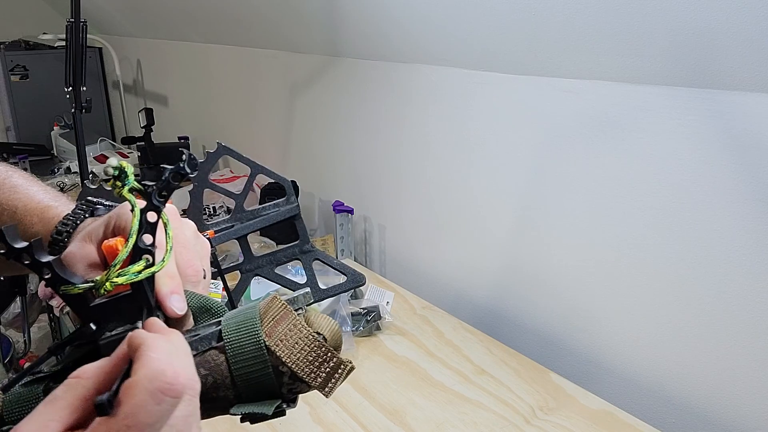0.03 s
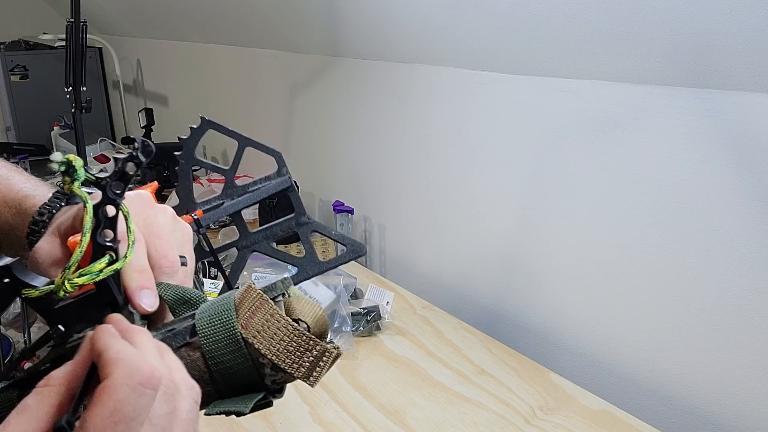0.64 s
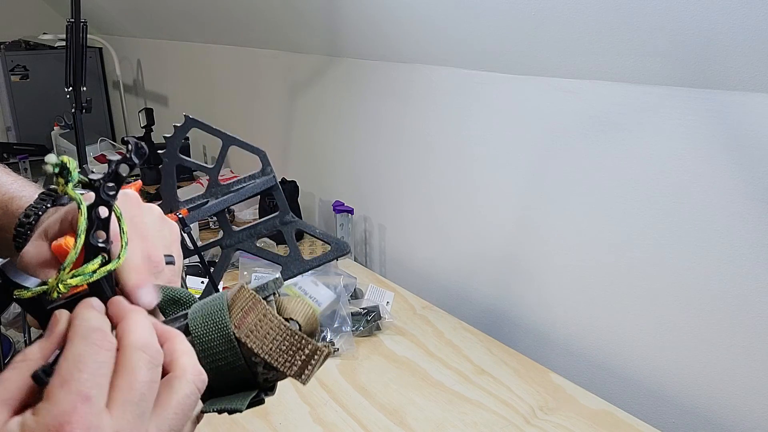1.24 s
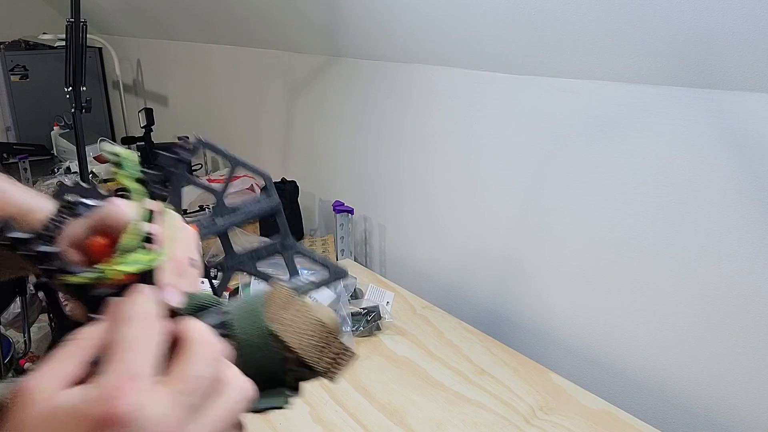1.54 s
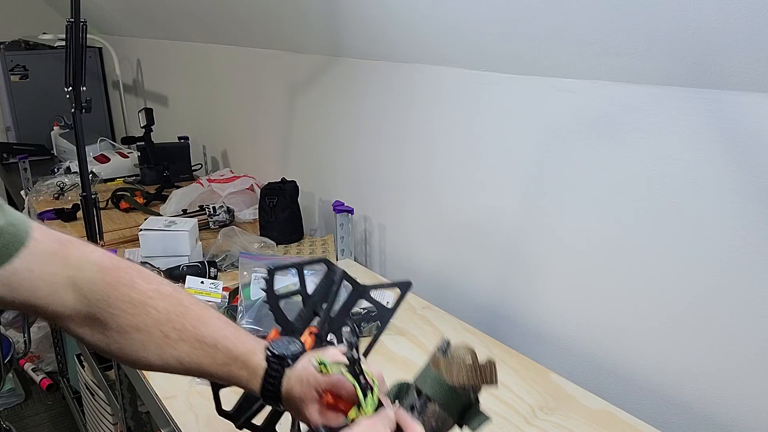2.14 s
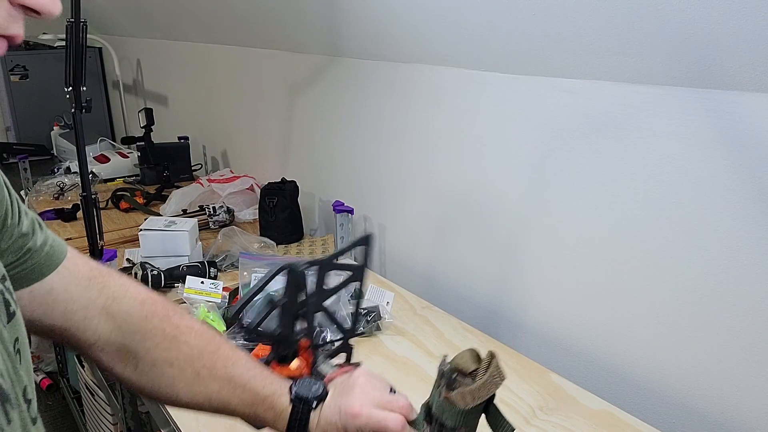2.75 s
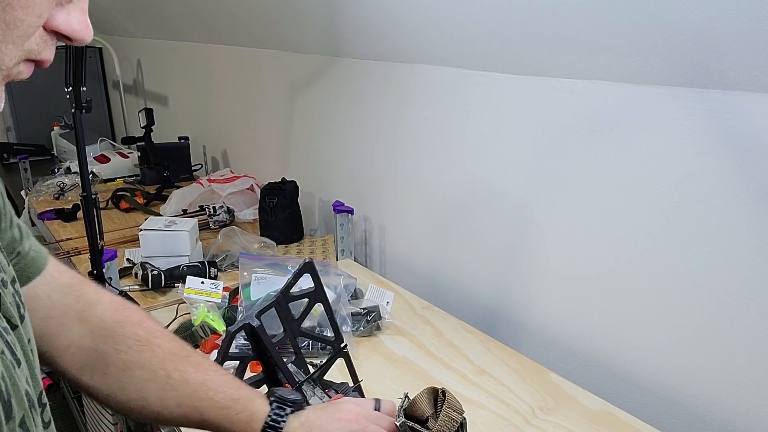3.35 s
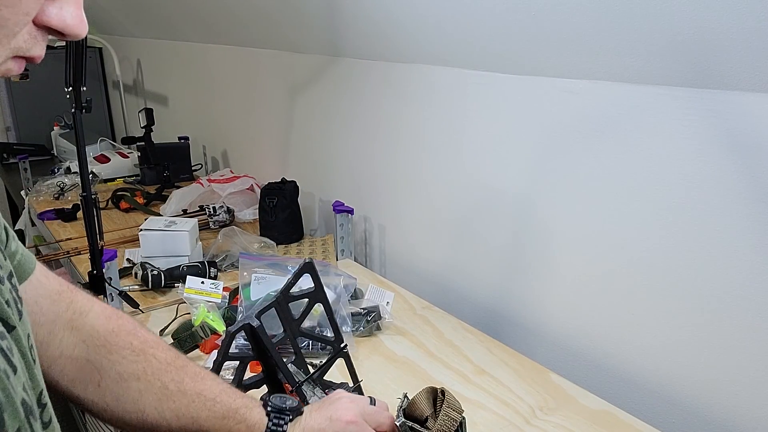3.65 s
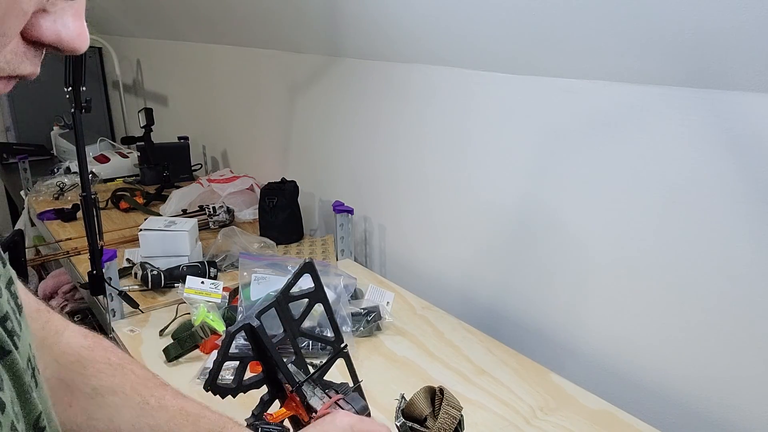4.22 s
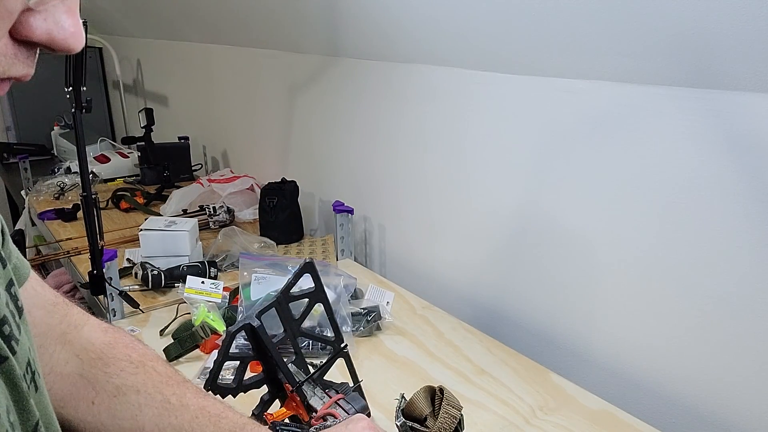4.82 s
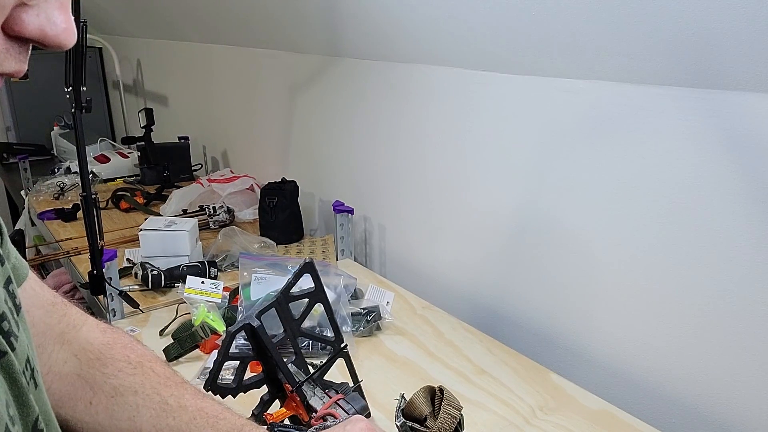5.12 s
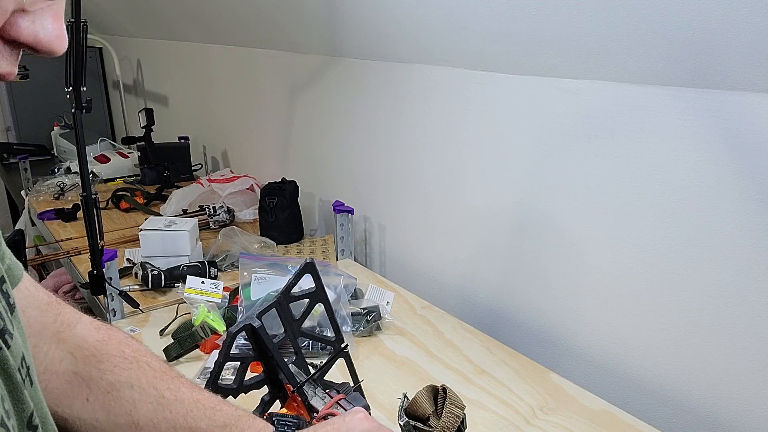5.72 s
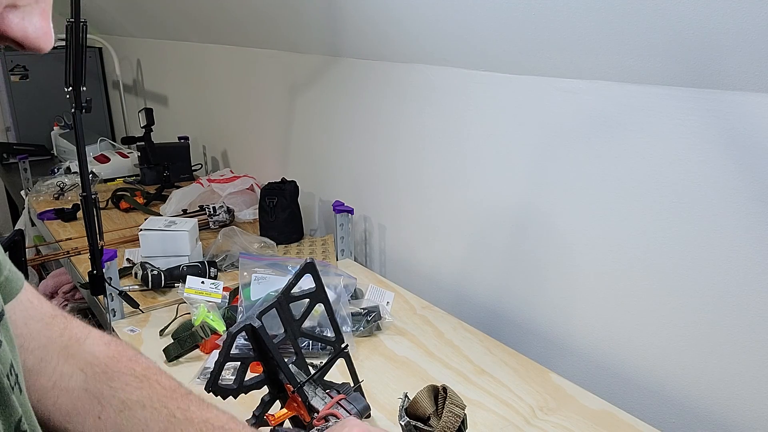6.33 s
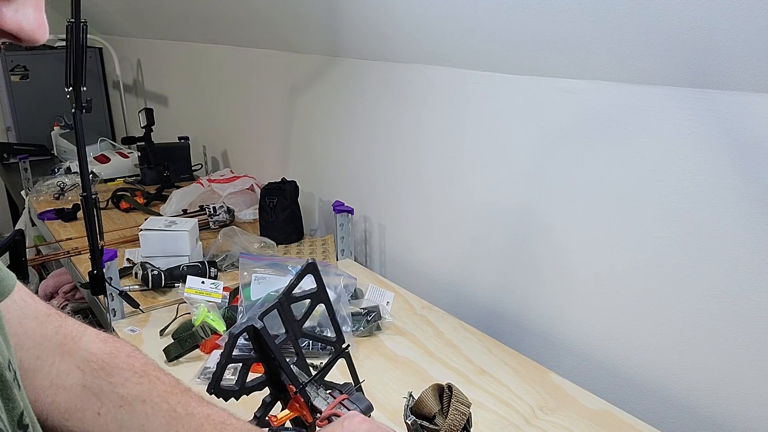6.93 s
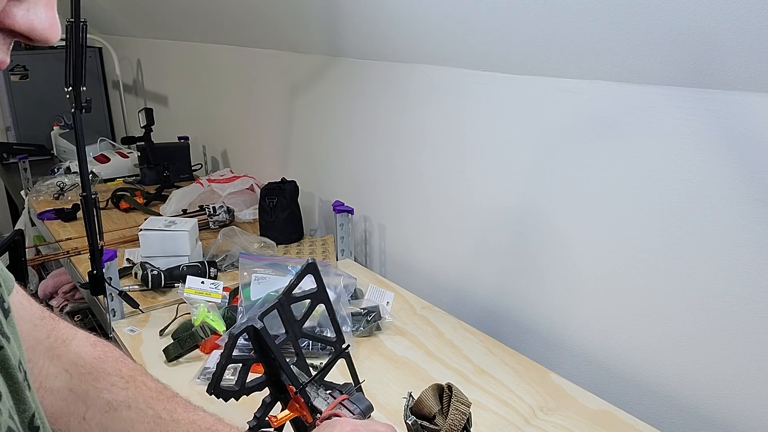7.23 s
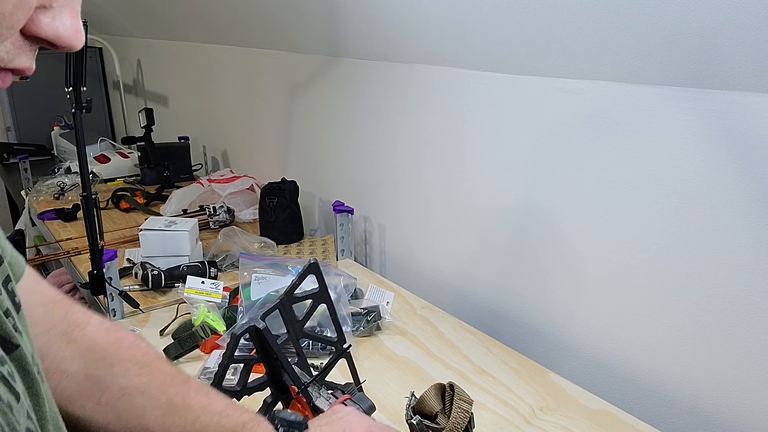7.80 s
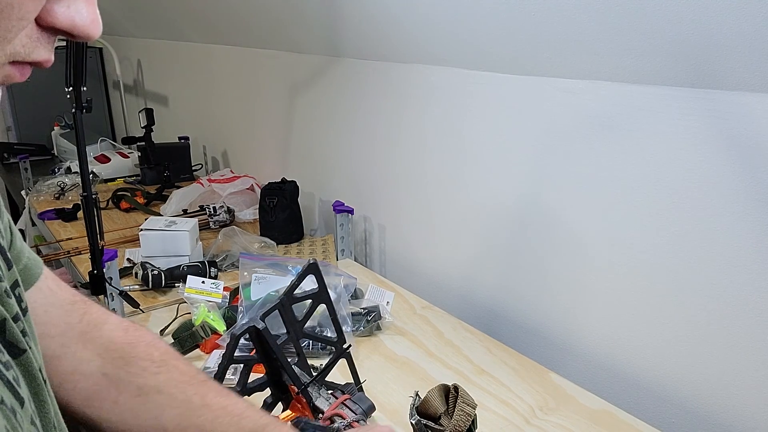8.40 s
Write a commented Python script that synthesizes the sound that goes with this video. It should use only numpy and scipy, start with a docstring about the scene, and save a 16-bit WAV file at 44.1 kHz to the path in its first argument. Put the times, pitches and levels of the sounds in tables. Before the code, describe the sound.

A faint fan hums throughout in a small workshop. At about 2 seconds a climbing stick with metal steps touches a plywood bench, then lands at 2.2 with hollow knocks, a low scuff and a faint metal ring, setting loose tools chattering. The loudest clunks come just after 3 seconds, with a bright rattle and another bounce at 3.3. Soft rubbing fades away by about 4.5. At 5.4 a plastic buckle clicks sharply, followed by tiny high ticks of webbing fibres being picked until 6.2. The strap swishes through the clicking buckle around 6.3 to 6.5, with faint tugs and clicks near 6.9 and 7.3. At about 7.9 the stick shifts with a short, low groan, then knocks down at 8.1, rattling the tools and rocking quickly to rest.

```python
"""A small workshop, a fan humming. A climbing stick with metal steps is lowered onto a plywood bench:
it slides, lands, rocks and bounces. Each blow flexes the top and rings its modes; the hard ones set
loose tools chattering. A webbing strap is picked at, fibres snapping, and swishes through its clicking
plastic buckle. Then the stick is shifted, groaning as it catches and slips, and knocked down once more."""
import sys
import numpy as np
from scipy import signal
from scipy.fft import rfft, irfft, next_fast_len
from scipy.io import wavfile
from scipy.ndimage import uniform_filter1d

SR = 44100
rng = np.random.default_rng(int(sys.argv[2]) if len(sys.argv) > 2 else 0)


def wav_record(signal):
    """Record a signal, one row per channel, as 16-bit PCM in the file named by sys.argv[1]."""
    frames = np.transpose(np.atleast_2d(signal))
    bounded = np.clip(frames, -1, 1)
    # unit amplitude maps onto the largest positive 16-bit level
    quanta = np.round(bounded * 32767).astype(np.int16)
    wavfile.write(sys.argv[1], SR, quanta)


N = 377496


def from_db(db):
    """Decibels to amplitude."""
    return 10 ** (np.asarray(db) / 20)


def at_hz(points, hz):
    """Read a curve on a log-frequency axis."""
    f, value = np.transpose(points)
    return np.interp(np.log(np.maximum(hz, 1)), np.log(f), value)


def fade(t, t60):
    """Exponential decay, 60 dB down after t60 seconds."""
    return np.exp(-np.log(1000) * t / t60)


def swell(t, rise_s):
    """Rounded attack of a contact that is not perfectly hard."""
    return (1 - np.exp(-t / rise_s)) ** 2


def mode(t, hz, db, t60):
    """One struck resonance: a decaying sine."""
    return from_db(db) * np.sin(2 * np.pi * hz * t) * fade(t, t60)


def add(out, s, sound):
    """Mix a sound in at s seconds."""
    i = round(s * SR)
    out[:, i:i + sound.shape[-1]] += sound[..., :N - i]


def pan(right_db):
    """Stereo gains with the right side louder by right_db."""
    return from_db(np.array([[-right_db], [right_db]]) / 2)


def noise(colour, size, width=None, weight=None):
    """Coloured stereo noise, mid rms about 1 before the optional weighting curve."""
    # default stereo image, narrow lows and wide highs: (frequency [Hz], side minus mid [dB])
    room_width = [(60, -24), (110, -29), (200, -10.5), (380, -11), (700, -5.5), (1290, 1), (2400, 0),
                  (15000, 1.5)]
    n = next_fast_len(size, True)
    hz = np.fft.rfftfreq(n, 1 / SR)
    gain = from_db(at_hz(colour, hz))
    gain /= np.sqrt(np.mean(gain ** 2))
    if weight is not None:
        gain *= from_db(at_hz(weight, hz))
    mid, side = rfft(rng.standard_normal((2, n))) * gain
    side *= from_db(at_hz(room_width if width is None else width, hz))
    return irfft([mid + side, mid - side], n)[:, :size]


def grains(per_s, spread_db, size):
    """Random tiny contacts of uneven strength, rms 1."""
    clicks = (rng.random(size) < per_s / SR) * rng.choice([-1, 1], size)
    clicks = clicks * from_db(spread_db * np.clip(rng.normal(size=size), -2, 2))
    return clicks / np.sqrt(np.mean(clicks ** 2) + 1e-12)


def strokes(rows, attack_s, release_t60):
    """Envelope of hand movements: each takes hold, keeps its pressure and lets go."""
    out, t = np.zeros((1, N)), np.arange(2 * SR) / SR
    for s, length, db in rows:
        add(out, s, from_db(db) * swell(t, attack_s) * fade(np.maximum(t - length, 0), release_t60))
    return out


def rub(colour, pressure, per_s, grit):
    """Friction noise that swells at each tiny catch of the surfaces; grit runs from 0 to 1."""
    catches = uniform_filter1d(grains(per_s, spread_db=2.5, size=N) ** 2, SR // 1000)
    return noise(colour, N) * pressure * np.sqrt(np.abs(1 - grit + grit * catches))


def workshop(x, wet_db, room_t60=0.61, treble_t60=0.44, treble_hz=6000):
    """Direct sound plus dense stereo reflections whose treble is absorbed sooner."""
    t = np.arange(SR // 2) / SR
    white = rng.standard_normal((2, len(t))) * (t > .002)
    dull = signal.sosfiltfilt(signal.butter(2, treble_hz, fs=SR, output="sos"), white)
    echoes = dull * fade(t, room_t60) + (white - dull) * fade(t, treble_t60)
    echoes /= np.sqrt(np.sum(echoes ** 2, axis=1, keepdims=True))
    return x + from_db(wet_db) * signal.fftconvolve(x, echoes, axes=1)[:, :N]


def fan(hum_hz, hum_db, air_db, hiss_db):
    """A steady bed of moving air, faint hiss and a narrow low drone."""
    # spectra of the air and the hiss: (frequency [Hz], level [dB])
    air_colour = [(15, -52), (25, -16), (43, -15), (76, -1), (141, -7.5), (173, -6.5), (208, -15),
                  (230, -3), (326, -6), (435, -2.5), (473, -10.5), (1220, -10.5), (1590, -14.5),
                  (2030, -13), (3400, -17), (4420, -68), (7480, -120)]
    hiss_colour = [(2800, -4.5), (3300, 6.5), (3800, 1.5), (4600, 3), (5200, -4.5), (7000, -4.5),
                   (8200, -23.5), (10000, -25.5), (16000, -21)]
    # their stereo image: (frequency [Hz], side minus mid [dB])
    air_width = [(60, -14), (200, -14), (380, -9.5), (700, -3), (1290, -0.5), (15000, 1.5)]
    air = from_db(air_db) * noise(air_colour, N, air_width) * pan(right_db=1.5)
    hiss = from_db(hiss_db) * noise(hiss_colour, N, air_width) * pan(right_db=5.5)
    peak = [(hum_hz / 2, -70), (hum_hz * .9, -20), (hum_hz, 0), (hum_hz * 1.1, -20), (hum_hz * 2, -70)]
    return air + hiss + from_db(hum_db) * noise(peak, N)


def frame_ring(hz, t60, laid_down_s):
    """The lifted frame sings in its lowest bending mode, choked once it is laid down."""
    # touches on the frame: (time [s], level [dB])
    touches = [(2.031, -63), (2.245, -49)]
    out, t = np.zeros((2, N)), np.arange(2 * SR) / SR
    for s, db in touches:
        choke = fade(np.maximum(s + t - laid_down_s, 0), t60=.1)
        add(out, s, mode(t, hz, db, t60) * choke)
    return out


def slide():
    """The stick scuffs over the wood with a low, smooth rub."""
    # moves of the stick: (time [s], length [s], level [dB])
    moves = [(2.03, 0.17, -57.5), (2.21, 0.35, -42.5), (2.6, 0.26, -54), (2.81, 0.21, -49.5),
             (3.03, 0.33, -37), (3.45, 0.35, -57.5), (3.9, 0.48, -62.5), (6.4, 0.11, -54),
             (7.3, 0.1, -56.5), (7.62, 0.024, -53), (7.853, 0.062, -45.5), (7.99, 0.081, -51),
             (8.14, 0.13, -48)]
    # scuff spectrum: (frequency [Hz], level [dB])
    scuff_colour = [(30, -11), (80, 9.5), (190, -9), (280, -6), (420, -3), (600, -8.5), (900, -18),
                    (2000, -21), (6000, -40), (12000, -73)]
    return rub(scuff_colour, strokes(moves, attack_s=0.009, release_t60=0.5), per_s=300, grit=0.046)


def judder(slips_per_s, jitter):
    """Pressed hard, the stick catches and slips almost regularly, and the panel gives a hollow groan."""
    # hard pushes: (time [s], length [s], level [dB])
    pushes = [(2.855, .07, -54), (7.864, .062, -45), (8.048, .02, -51)]
    # panel modes rung by a slip: (frequency [Hz], level [dB], t60 [s])
    groan_modes = [(86, -3, .06), (445, 2, .05)]
    out, t = np.zeros((2, N)), np.arange(SR // 8) / SR
    slip = sum(mode(t, hz, db, t60) for hz, db, t60 in groan_modes)
    for s, length, db in pushes:
        starts = np.cumsum(1 + jitter * rng.uniform(-1.27, 1, size=16)) / slips_per_s
        for start in starts[starts < length]:
            add(out, s + start, from_db(db) * slip)
    return out


def strap():
    """Webbing swishes through the buckle and rasps on the stick once it is taut."""
    # pulls through the buckle, tugs on the stick: (time [s], length [s], level [dB])
    pulls = [(6.288, 0.16, -49), (7.828, 0.065, -64)]
    tugs = [(6.372, 0.078, -46.5), (6.925, 0.068, -64), (7.28, 0.034, -58.5)]
    # spectra of the airy swish and the darker drag: (frequency [Hz], level [dB])
    swish_colour = [(1000, -18), (3500, -10), (5200, -11.5), (6700, -1), (8800, -15.5), (10500, -9),
                    (12500, -5), (15800, -9)]
    drag_colour = [(35, -17), (70, 20), (140, -1), (240, -8), (400, 1), (800, -16), (1400, 3), (2100, 4.5),
                   (3000, -4.5), (4000, -33), (8000, -46)]
    swish = rub(swish_colour, strokes(pulls, attack_s=0.0094, release_t60=0.27), per_s=1200, grit=0.36)
    drag = rub(drag_colour, strokes(tugs, attack_s=0.0064, release_t60=0.32), per_s=320, grit=0.34)
    return swish * pan(right_db=2.5) + drag * pan(right_db=1.0)


def fibre_snaps(centre_hz, cycles, scatter_octaves, fray_db, fray_t60):
    """Picked webbing fibres snap free: a tick of a few cycles, then a brief fray of noise."""
    # fibres letting go: (time [s], level [dB])
    snaps = [(5.5611, -44.5), (5.5824, -44.5), (5.6344, -46), (5.8334, -44), (5.8657, -42.5), (5.911, -46),
             (5.9658, -43.5), (6.023, -43), (6.033, -39.5), (6.047, -44), (6.058, -41), (6.07, -41),
             (6.1034, -46), (6.2276, -46)]
    out, t = np.zeros((2, N)), np.arange(SR // 20) / SR
    pitches = centre_hz * 2 ** (scatter_octaves * rng.uniform(-0.86, 1, len(snaps)))
    for (s, db), hz in zip(snaps, pitches):
        tick = mode(t, hz, db=0, t60=cycles / hz)
        fray_colour = [(hz / 4, -24), (hz / 3, -4), (hz, 0), (hz * 1.36, -6), (hz * 4, -28)]
        fray = noise(fray_colour, len(t)) * fade(t, fray_t60)
        add(out, s, from_db(db) * (tick + from_db(fray_db) * fray))
    return workshop(out, wet_db=-6.5) * pan(right_db=1.0)


def buckle(wet_db, bounce_s, bounce_loss_db, count):
    """Each touch bounces and briefly rings the buckle; a sharper one favours the high modes."""
    # modes of the plastic: (frequency [Hz], level [dB], t60 [s])
    plastic_modes = [(2180, -3, 0.009), (3100, 3, 0.0041), (4670, -2.5, .004), (6450, -0.5, 0.0034)]
    # touches on the buckle: (time [s], level [dB], brightness [dB/octave])
    touches = [(.4415, -60, 9), (0.7345, -52, -3), (.7603, -62, 6), (1.2854, -54, 4), (2.953, -50, 13),
               (5.4114, -36, 2.5), (6.382, -45, -9), (6.403, -43, -3), (6.464, -45, -2), (6.931, -57, -1),
               (7.301, -53, -1), (7.635, -57, -8)]
    out, t = np.zeros((2, N)), np.arange(SR // 20) / SR
    middle_hz = np.mean(np.array(plastic_modes)[:, 0])
    for s, db, tilt_db in touches:
        click = sum((-1) ** k * mode(t, hz, mode_db + tilt_db * np.log2(hz / middle_hz), t60)
                    for k, (hz, mode_db, t60) in enumerate(plastic_modes))
        for k in range(count):
            add(out, s + k * bounce_s * rng.uniform(0.67, 1.2), from_db(db - k * bounce_loss_db) * click)
    return workshop(out, wet_db) * pan(right_db=4.5)


def rattles(per_s, spread_db, contact_t60, ring_db, favour_db):
    """Jolted tools chatter in bursts of short cracks while the metal rings up."""
    # jolts: (time [s], level [dB], length [s], brightness [dB/octave], favoured ring [Hz])
    jolts = [(2.241, -36, 0.065, 4, 2900), (2.313, -38, 0.079, 2.4, 5900), (3.066, -24.5, 0.032, 0, 3020),
             (3.10, -37, 0.099, 5.5, 4330), (3.298, -35, 0.051, 4.5, 1970), (8.147, -37.5, 0.035, 1, 3100),
             (8.178, -42.5, 0.074, 0.6, 2081)]
    # modes of the steps and tools: (frequency [Hz], level [dB], t60 [s])
    metal_modes = [(1536, -5, .45), (1753, -4, .35), (1971, -2, .42), (2003, -5, .4), (2060, -2, .25),
                   (2081, 1, .35), (2191, -4, .2), (2600, -7, .25), (2706, 0, .3), (2830, -6, .35),
                   (3112, -3, .2), (3680, -12, .3), (4005, -11, .35), (4366, -6, .38), (4721, -13, .35),
                   (5300, -15, .35), (5943, -7, .38), (6310, -14, .35)]
    # spectrum of one contact: (frequency [Hz], level [dB])
    clatter_colour = [(300, -21), (1200, 6.5), (2100, 5.5), (2500, 2.5), (3100, 0.5), (3800, -1),
                      (5200, -7), (6600, -8), (8200, -22), (11000, -35.5), (14000, -39), (16000, -53)]
    cracks, rings, t = np.zeros((2, N)), np.zeros((2, N)), np.arange(SR // 2) / SR
    decay = fade(t, contact_t60)
    envelope = swell(t, rise_s=0.00062) * decay / np.linalg.norm(decay)
    for s, db, length, tilt_db, ring_hz in jolts:
        tilt = [(1000, -2 * tilt_db), (16000, 2 * tilt_db)]
        crack = noise(clatter_colour, len(t), weight=tilt) * envelope
        contacts = grains(per_s, spread_db, int(length * SR))
        add(cracks, s, from_db(db) * signal.fftconvolve(contacts[None], crack, axes=1))
        for hz, mode_db, t60 in metal_modes:
            # energy builds while the contacts last, then dies away
            build = np.sqrt(1 - fade(np.minimum(t, length), t60) ** 2)
            release = fade(np.maximum(t - length, 0), t60)
            boost_db = favour_db * np.exp(-(np.log2(hz / ring_hz) / 0.19) ** 2)
            tone = np.sin(2 * np.pi * (hz * t + rng.random((2, 1))))
            add(rings, s, from_db(db + ring_db + mode_db + boost_db) * build * release * tone)
    return (workshop(cracks, wet_db=0.5) + rings) * pan(right_db=3.0)


def rocks(count, boom_loss_db, edge_loss_db):
    """Evenly spaced blows of the stick rocking to rest, each softer and duller than the last."""
    # first blows: (time [s], boom [dB], body [dB], wood [dB], crack [dB], period [s])
    rocking = [(2.318, -30, -32, -32.5, -28.5, .138), (8.2396, -34, -24.5, -32, -40, .129)]
    return [(s + k * period, boom_db - k * boom_loss_db, *(np.array(edge_db) - k * edge_loss_db))
            for s, boom_db, *edge_db, period in rocking for k in range(count)]


def knocks(flex_db, flex_s, flex_lag_s, soft_db, modes_db, thud_db, thud_t60, attack_s,
           room_db, room_t60, build_s, linger_db, linger_t60):
    """Each blow of the stick flexes the bench top once, rings its modes and fills the room."""
    # blows on the bench: (time [s], boom [dB], body [dB], wood [dB], crack [dB])
    blows = [(2.031, -57, -43, -43.5, -43.5), (2.2328, -14, -25, -21, -21.5),
             (2.246, -24, -24.5, -29.5, -19), (2.256, -22, -23.5, -21.5, -21.5),
             (2.860, -36, -39, -40, -55), (2.887, -43, -30, -44.5, -62), (2.912, -43, -41, -39.5, -49),
             (3.0602, -14, -18, -10.5, -11), (3.067, -29, -10.5, -15.5, -12.5),
             (3.128, -26, -22, -21.5, -50), (3.2763, -20.5, -23.5, -20, -24),
             (3.295, -20.5, -22.5, -21.5, -28), (7.994, -35.5, -55, -48, -63),
             (8.1397, -19, -21.5, -20, -37), (8.149, -37, -28, -23, -26.5)]
    # modes of the plywood top and stick: (frequency [Hz], level [dB], t60 [s])
    bench_modes = [(61, -9, .68), (78, -7, .5), (101, -12, .3), (122, -13, .4), (151, -14, .48),
                   (192, -21, .4), (224, -21, .4), (261, -19, .35), (293, -14, .35), (343, -17, .38),
                   (370, -15, .45), (401, -16, .36), (439, -21, .35), (492, -20, .4), (511, -23, .4),
                   (568, -27, .7), (648, -26, .4), (703, -22, .52), (748, -24, .35), (820, -25, .35),
                   (983, -19, .35), (1139, -16, .36), (1256, -22, .3), (1298, -16, .35)]
    # spectra of dense damped panel modes, reverb and its dull late tail: (frequency [Hz], level [dB])
    thud_colour = [(25, -40), (55, -13), (90, 8), (180, -11.5), (380, 1.5), (650, -7), (870, -13.5),
                   (1250, -15), (1600, -15.5), (2500, -18.5), (3200, -20), (3900, -48), (6500, -36),
                   (9000, -60), (16000, -73)]
    room_colour = [(25, -34), (60, 1.5), (110, 5), (200, 0.5), (380, -7.5), (650, -8), (870, -26),
                   (1250, -9.5), (1600, -20), (2400, -18.5), (3200, -21.5), (3900, -30.5), (6500, -30),
                   (9000, -79), (16000, -66)]
    linger_colour = [(25, -27), (65, 9.5), (200, 0.5), (380, -17), (800, -7.5), (2400, -13), (5000, -54),
                     (9000, -61), (16000, -63)]
    out, t = np.zeros((2, N)), np.arange(SR) / SR
    modes = np.array([(-1) ** k * mode(t, hz, modes_db + db, t60)
                      for k, (hz, db, t60) in enumerate(bench_modes)])
    settling = rocks(count=3, boom_loss_db=6, edge_loss_db=17)
    for s, boom_db, body_db, wood_db, crack_db in blows + settling:
        # spectrum of this blow: (frequency [Hz], level [dB])
        force = [(120, boom_db), (220, body_db), (370, wood_db), (840, wood_db), (1150, crack_db)]
        # the panel dips, springs up and settles, more slowly under a soft, boomy blow
        u = (t - flex_lag_s) / (flex_s * 2 ** ((boom_db - wood_db) / soft_db))
        flex = from_db(flex_db + (boom_db + body_db) / 2) * (1 - 2 * u ** 2) * np.exp(-u ** 2)
        ring = from_db(at_hz(force, np.array(bench_modes)[:, 0])) @ modes
        thud = from_db(thud_db) * noise(thud_colour, SR, weight=force) * fade(t, thud_t60)
        room = from_db(room_db) * noise(room_colour, SR, weight=force) * fade(t, room_t60)
        tail = from_db(linger_db) * noise(linger_colour, SR, weight=force) * fade(t, linger_t60)
        add(out, s, (flex + ring + thud + room * swell(t, build_s) + tail) * swell(t, attack_s))
    return out


def scene():
    """Blows and rattles up front, strap and stick handling beneath, the fan behind."""
    bench = knocks(flex_db=2.5, flex_s=0.0025, flex_lag_s=.0037, soft_db=11, modes_db=-3.0,
                   thud_db=1.0, thud_t60=0.13, attack_s=0.0007,
                   room_db=-5.5, room_t60=0.47, build_s=0.0043, linger_db=-21.5, linger_t60=1.03)
    tools = rattles(per_s=600, spread_db=0.5, contact_t60=0.015, ring_db=-11.5, favour_db=7)
    clicks = buckle(wet_db=-2.5, bounce_s=.0016, bounce_loss_db=1.5, count=3)
    picking = fibre_snaps(centre_hz=11200, cycles=3.7, scatter_octaves=.13, fray_db=-10, fray_t60=0.027)
    scuff = slide()
    groan = judder(slips_per_s=80, jitter=0.034)
    frame = frame_ring(hz=379, t60=3.3, laid_down_s=3.1)
    webbing = strap()
    bed = fan(hum_hz=71.1, hum_db=-73, air_db=-58.5, hiss_db=-70)
    return bench + frame + tools + clicks + picking + webbing + scuff + groan + bed


def record(dry):
    """A soft clip rounds the highest peaks and a steep low-pass trims the top."""
    ceiling, cutoff_hz = .8, 16000
    rounded = dry / (1 + (dry / ceiling) ** 6) ** (1 / 6)
    return signal.sosfilt(signal.ellip(10, .1, 70, cutoff_hz, fs=SR, output="sos"), rounded)


dry = scene()
out = record(dry)
wav_record(out)
```